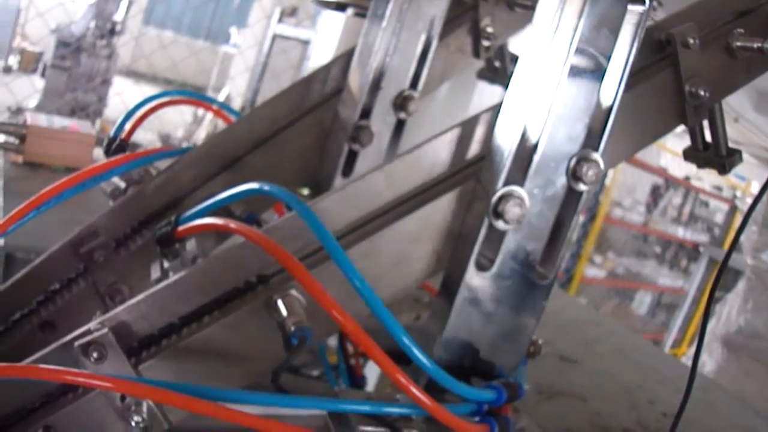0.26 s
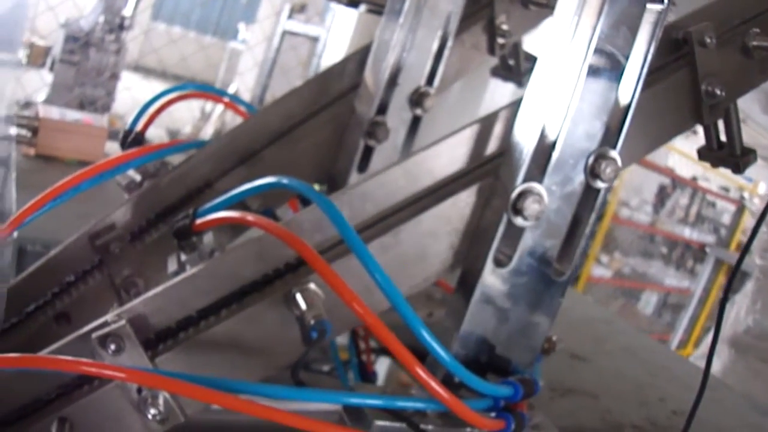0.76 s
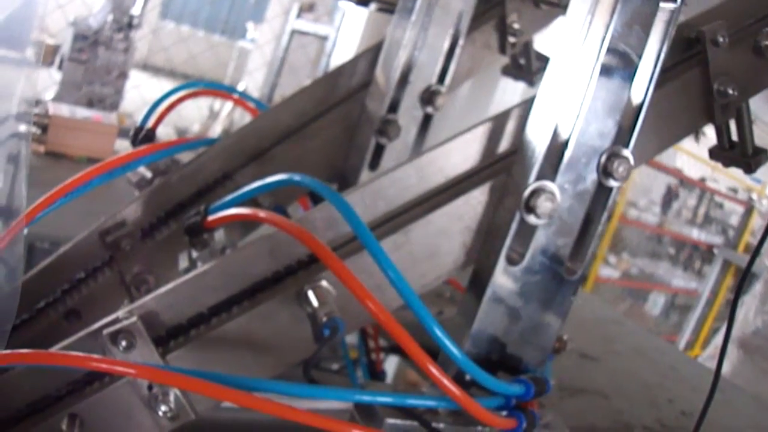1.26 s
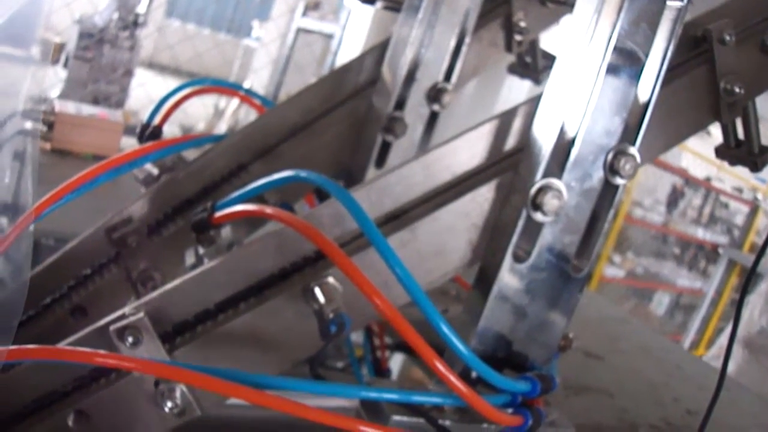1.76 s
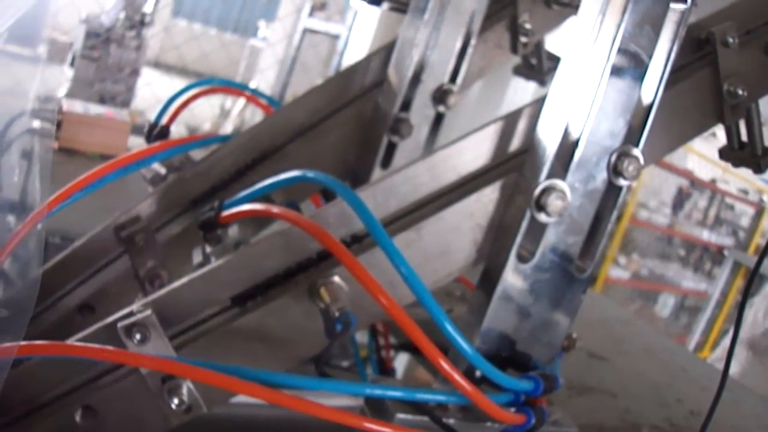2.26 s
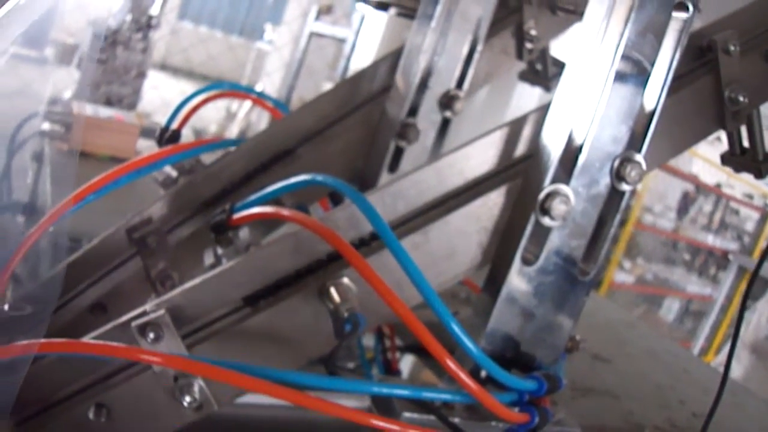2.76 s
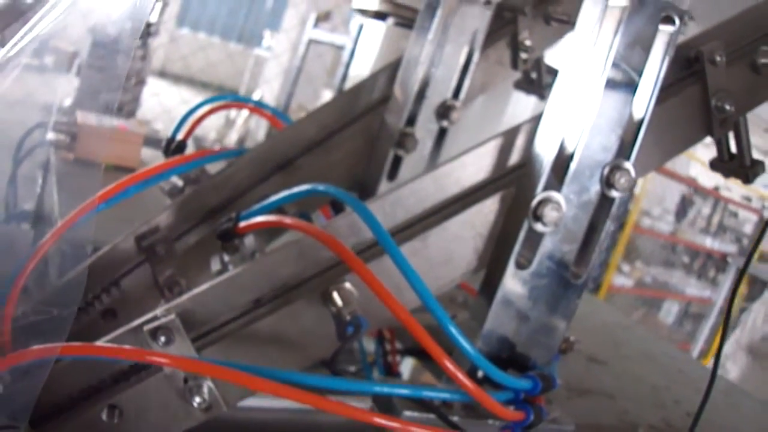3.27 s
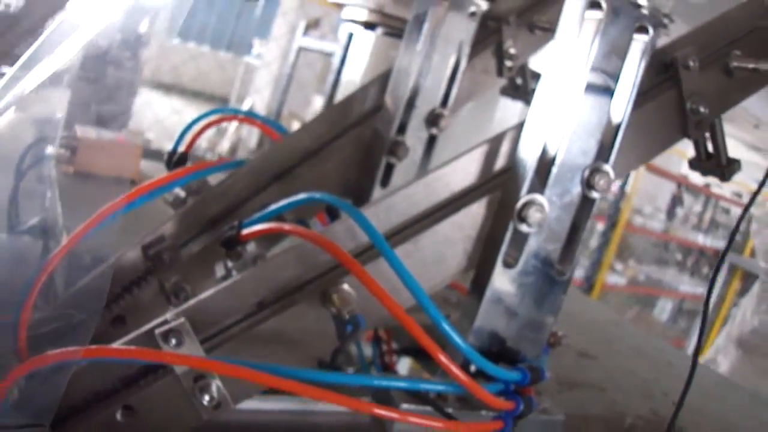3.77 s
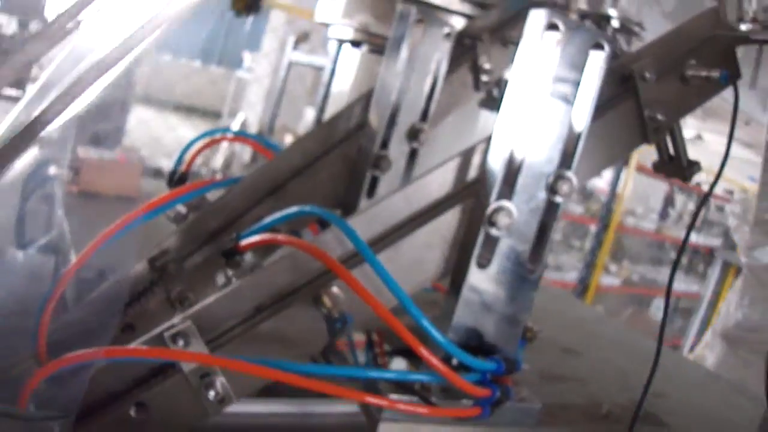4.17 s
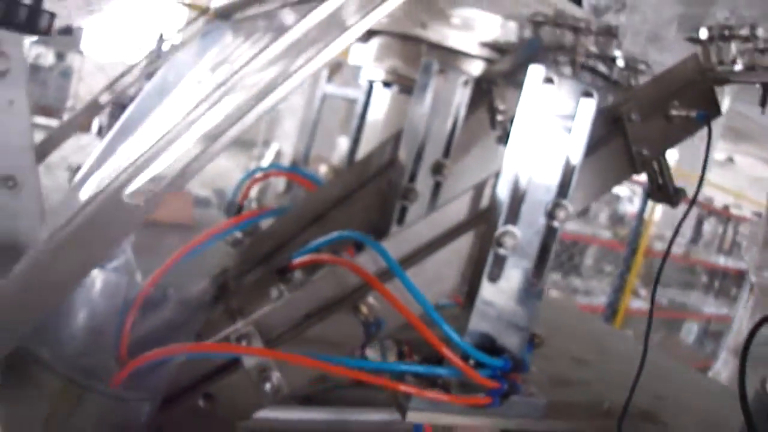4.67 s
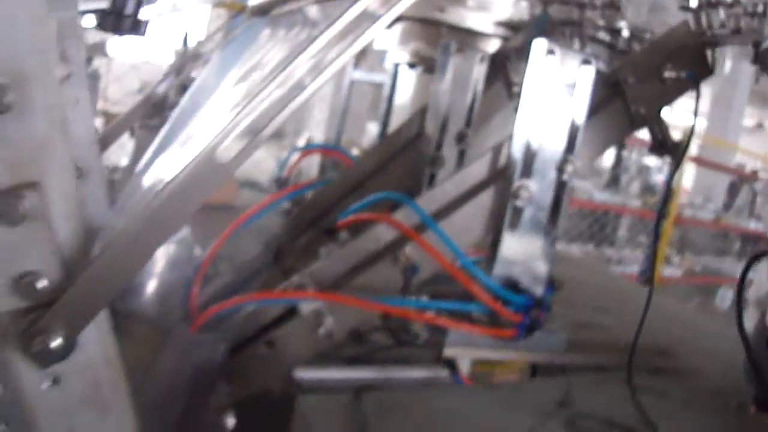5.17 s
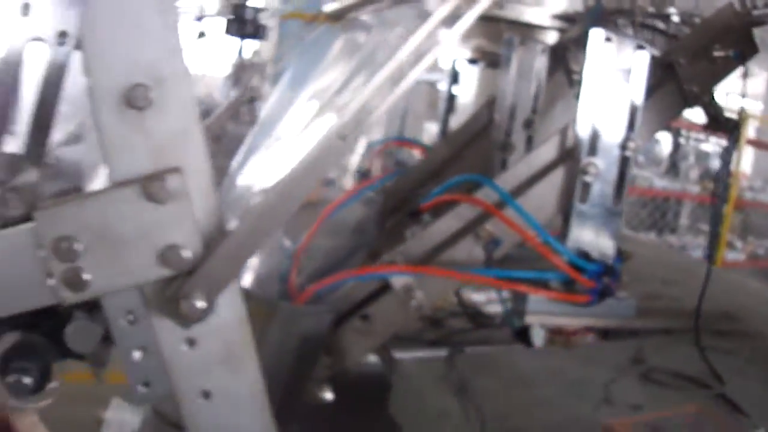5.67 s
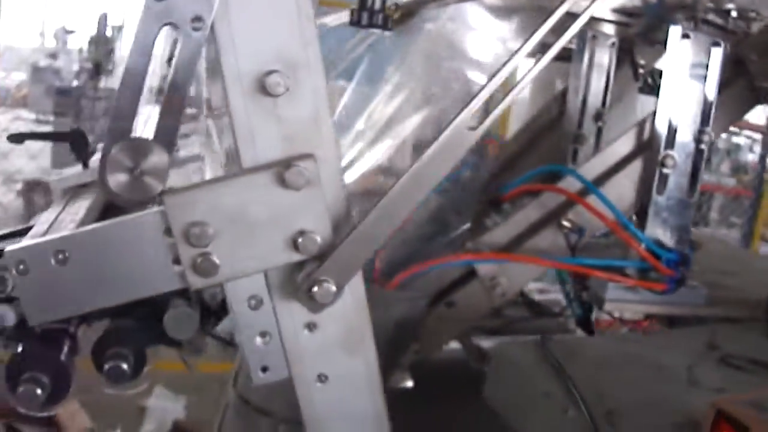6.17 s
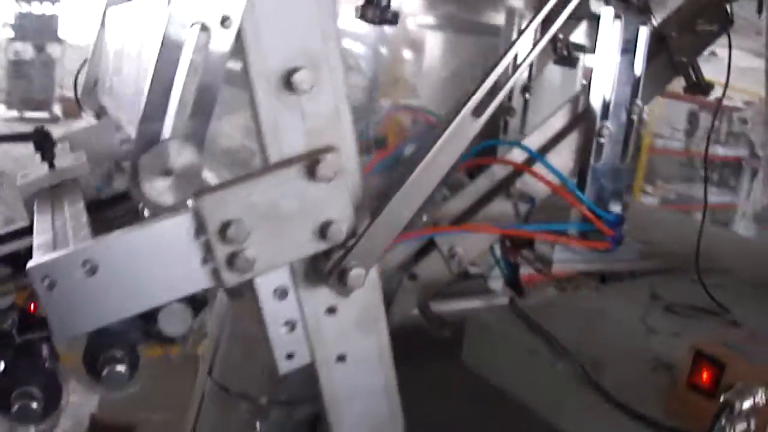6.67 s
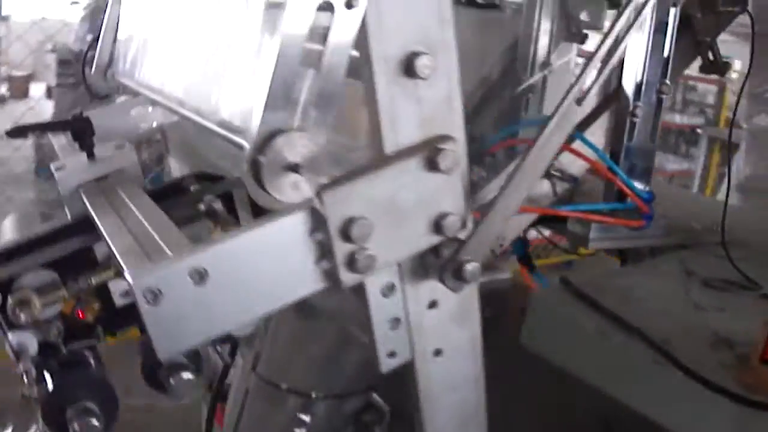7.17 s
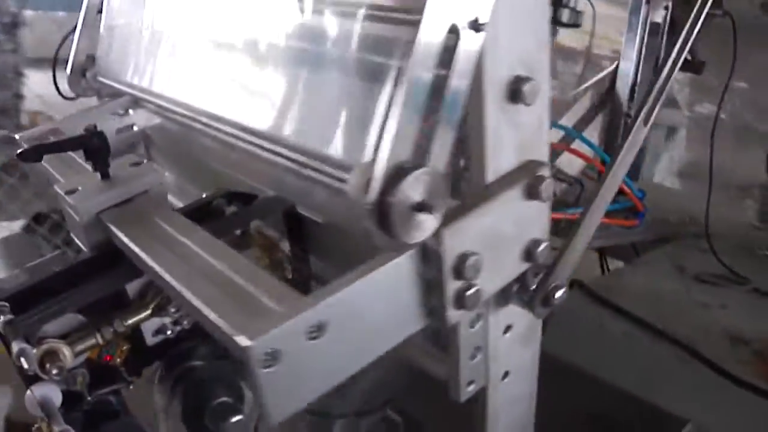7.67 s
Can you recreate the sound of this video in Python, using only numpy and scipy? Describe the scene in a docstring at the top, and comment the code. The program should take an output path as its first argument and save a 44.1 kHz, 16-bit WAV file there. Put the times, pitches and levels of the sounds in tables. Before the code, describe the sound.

Dense, bright metallic hiss and rattle from a packaging machine's feeders, scattered clacks, a crackling spill, then rising hall roar and squeaky rollers.

```python
"""Small parts on vibrating feeders

Vibrating feeders shake hard parts along steel: tiny random impacts, bunched by the mains-driven stroke, make a hiss
that swells as batches pass and rings chutes, bowl and track, coded as decaying modes; guards add a hollow ring.
Parts clack and crackle as filtered noise bursts and hits, ping as wavering modes, and a few knock dully.
A hopper wall drones, and filtered noise makes the factory roar, louder as the microphone turns to the film rollers.
Over mains hum, film starts to rasp there near the end, and rough modes squeal."""
import sys
import numpy as np
from scipy import signal
from scipy.fft import rfft, irfft, next_fast_len
from scipy.io import wavfile

SR = 44100
rng = np.random.default_rng(int(sys.argv[2]) if len(sys.argv) > 2 else 0)


def inscribe(sig):
    """Save sig as 16-bit PCM at rate SR to the path in sys.argv[1].

    A 1-D sig is mono; a 2-D sig holds one channel per row.
    Samples are clipped to [-1, 1] before scaling.
    """
    pcm = np.round(np.clip(np.atleast_2d(sig).T, -1, 1) * 32767)
    wavfile.write(sys.argv[1], SR, pcm.astype(np.int16))


N = 348831
TIME = np.arange(N) / SR
FREQ = np.fft.rfftfreq(N, 1 / SR)

# Roar of the hall. Each row: frequency in Hz, relative level in dB per Hz.
ROAR_SPECTRUM = [(25, -53), (100, -40), (200, -26), (400, -17.5), (750, -4.5), (1300, -1), (2200, -19),
                 (3600, -10.5), (6000, -4.5), (11000, -10)]
# Hum of the feeder magnets. Each row: frequency in Hz, level in dB before it opens up and wavers.
HUM_TONES = [(50, -91), (100, -90), (150, -82), (200, -73)]
# The load shifts in the hopper. Each row: start in seconds, length in seconds, extra drone in dB.
LOAD_SHIFTS = [(0.15, 0.19, 4), (0.65, 0.74, 2.5), (2.38, 0.06, 9), (3.33, 0.31, 6), (4.08, 0.15, 1),
               (5.22, 0.17, 5), (6.2, 0.43, 4)]
# Film rasping over the rollers. Each row: frequency in Hz, relative level in dB per Hz.
FILM_SPECTRUM = [(100, -40), (900, -8), (1300, 4.5), (1900, -4), (2300, -38), (2650, 2.5), (3300, 2),
                 (4600, -5), (6000, -18), (11000, -15)]
# Film rollers and their arms. Each row: frequency in Hz, width in Hz, relative level in dB.
ROLLER_MODES = [(765, 40, -7), (1330, 120, -2), (3150, 250, -1), (3520, 90, -2)]
# Roller squeals. Each row: start in seconds, length in seconds, frequency in Hz, level in dB, width in Hz.
SQUEALS = [(7.28, 0.09, 4110, -40, 90), (7.33, 0.12, 3540, -40, 70), (7.48, 0.06, 3355, -38.5, 20),
           (7.52, 0.17, 3525, -35.5, 45), (7.66, 0.19, 3635, -36.5, 60), (7.71, 0.2, 3540, -40, 50),
           (7.55, 0.08, 3200, -39, 110), (7.58, 0.37, 1765, -42.5, 30), (7.62, 0.33, 1915, -43, 70),
           (7.7, 0.25, 1861, -36.6, 11)]
# Dull knocks on the frame. Each row: start in seconds, peak in dB, 60 dB decay in seconds, lowest Hz.
KNOCKS = [(0.59, -44, 0.12, 70), (1.833, -32.5, 0.04, 70), (2.355, -27.8, 0.04, 185),
          (2.409, -33.5, 0.04, 85), (2.419, -33.5, 0.05, 80), (2.441, -38.5, 0.1, 75),
          (2.48, -43, 0.04, 130)]
# Chatter that makes one spot sing. Each row: time of the height in seconds, frequency in Hz, level in dB,
# length in seconds, width in Hz.
PINGS = [(0.053, 5690, -40, 0.16, 15), (0.09, 8014, -43, 0.16, 8), (0.14, 7068, -38, 0.14, 12),
         (0.28, 5186, -40, 0.14, 8), (0.18, 1920, -40, 0.3, 40), (0.72, 5730, -41, 0.6, 110),
         (0.77, 8014, -39.5, 0.2, 8), (0.95, 3620, -43, 0.6, 170), (1.39, 972, -44, 0.17, 12),
         (1.48, 3630, -39, 0.62, 170), (1.71, 972, -43, 0.1, 12), (1.85, 8014, -38, 0.42, 8),
         (1.9, 7068, -43.5, 0.4, 12), (1.945, 5690, -35, 0.11, 12), (1.93, 5186, -39.5, 0.2, 8),
         (2.3, 8014, -38, 0.2, 8), (2.44, 3165, -38, 0.14, 30), (2.45, 2657, -39, 0.14, 50),
         (2.49, 565, -45, 0.22, 14), (2.5, 1410, -40, 0.13, 60), (2.45, 5690, -39.5, 0.14, 20),
         (2.66, 5690, -36.5, 0.22, 12), (2.67, 5785, -38.5, 0.2, 30), (2.62, 285, -60, 0.2, 14),
         (2.8, 8014, -41, 0.2, 8), (2.82, 972, -47, 0.85, 14), (2.95, 1930, -43, 0.8, 130),
         (2.965, 8014, -36.5, 0.17, 8), (3.44, 8123, -39.5, 0.16, 12), (3.7, 8123, -43.5, 0.35, 10),
         (3.81, 5040, -41, 0.2, 20), (4.05, 7600, -42, 0.6, 50), (5.28, 1220, -40, 0.05, 50),
         (5.312, 1644, -36, 0.08, 12), (5.5, 1484, -43, 0.35, 16), (5.9, 1585, -42, 0.14, 25),
         (5.98, 1468, -43, 0.25, 20), (6.118, 5183, -34.5, 0.17, 12), (6.37, 1380, -38, 0.05, 110),
         (6.403, 5186, -36, 0.08, 8), (6.8, 2660, -41, 0.6, 150), (6.7, 1220, -40, 0.1, 35),
         (6.83, 966, -42, 0.2, 16), (6.95, 1472, -38.5, 0.11, 28), (6.98, 1370, -41, 0.12, 40),
         (7.045, 1233, -36, 0.1, 22), (7.05, 1478, -40, 0.08, 28), (7.2, 1480, -36.5, 0.11, 26),
         (7.24, 760, -39.5, 0.11, 14), (7.48, 4480, -37, 0.12, 18), (7.78, 975, -41, 0.3, 14)]
# Parts dropping on a chute. Each row: start in seconds, impact level in dB before CLACK_TRIM_DB, lowest Hz.
CLACKS = [(0.247, -26.4, 1500), (0.649, -23.3, 600), (0.834, -25, 2000), (1.237, -27, 1200),
          (1.568, -28.3, 2000), (2.398, -30, 2000), (2.416, -26, 2500), (2.431, -27, 900),
          (2.483, -24.5, 1800), (2.495, -28, 3000), (2.52, -30, 3000), (2.954, -22.8, 2600),
          (3.384, -23.5, 900), (3.535, -27.9, 1200), (3.923, -25.8, 1200), (4.181, -27.5, 2500),
          (4.192, -26.3, 600), (4.288, -25.8, 1200), (4.305, -28, 900), (5.006, -23, 600),
          (5.067, -30, 1500), (5.27, -27.5, 1200), (5.83, -28.6, 1200), (6.484, -31, 2000),
          (7.663, -30, 2500)]
# Hard part on steel. Each row: frequency in Hz, relative level in dB per Hz.
CLACK_SPECTRUM = [(100, -45), (500, -17), (1300, -2), (2300, -2), (3700, 0), (5500, -1), (8000, -6),
                  (11000, -8)]
# Pours of the nearest batch. Each row: start in seconds, length in seconds, linear gain.
SPILLS = [(2.335, 0.04, 0.45), (2.394, 0.058, 0.85), (2.477, 0.022, 0.85), (2.508, 0.026, 0.75)]
# Hollow ring of the sheet guards. Each row: frequency in Hz, relative level in dB per Hz.
GUARD_SPECTRUM = [(400, -54), (1050, -27), (1220, -0.5), (1370, 4), (1560, 1), (1920, -1), (2200, -23),
                  (4000, -32)]
# Level of that ring. Each row: time in seconds, level in dB.
GUARD_LEVEL = [(0.1, -37.5), (0.45, -40.5), (1.1, -42), (1.7, -37), (2.0, -40), (2.5, -40.5), (2.7, -43),
               (3.15, -47), (3.3, -40), (4.3, -35.5), (4.55, -40), (5.1, -41), (5.35, -41), (5.6, -44),
               (6.0, -39), (6.25, -45), (6.9, -42.5), (7.9, -50)]
# The parts' own clicks. Each row: frequency in Hz, relative level in dB per Hz.
RATTLE_SPECTRUM = [(25, -43), (70, -39), (150, -31.5), (310, -21), (430, -15), (700, -13), (1080, -9),
                   (1300, -5.5), (1900, -2.5), (2250, -5), (3000, -4), (3700, -3), (4400, -4), (5600, -3),
                   (7300, -6), (9300, -3.5), (11000, -5.5)]
# Batches that crowd the chutes. Each row: start in seconds, length in seconds, extra flow in dB.
BATCHES = [(0.58, 0.12, 0.6), (1.14, 1.29, 1.5), (2.33, 0.18, 1.8), (3.33, 1, 1.1), (4.14, 0.11, 0),
           (6.48, 0.3, 0.9)]
# Modes of the chutes and guards. Each row: frequency in Hz, width in Hz, level in dB before the shaking gain.
CHUTE_MODES = [(561, 6, -56), (769, 56, -51.5), (900, 12, -53), (972, 14, -52), (1219, 71, -47),
               (1369, 9, -49), (1475, 5, -52), (1650, 9, -51), (1769, 5, -54.7), (1915, 26, -49),
               (2360, 16, -51), (2425, 5, -54), (2571, 74, -45.5), (2843, 51, -47), (2964, 19, -49.8),
               (3165, 70, -51), (3358, 24, -53.5), (3551, 90, -44), (3694, 50, -44.7), (4112, 80, -45)]
# Modes of the bowl. Each row: frequency in Hz, width in Hz, level in dB before the shaking gain.
BOWL_MODES = [(4481, 14, -47.2), (4674, 6, -52.1), (5048, 27, -45.7), (5186, 8, -47.5), (5690, 11, -44.2),
              (5787, 28, -44.5), (6333, 5, -51.0), (6394, 12, -51.1), (6615, 9, -50.1), (6732, 5, -51.6),
              (6860, 12, -47.2), (7068, 13, -45.8), (7125, 15, -49.4), (7427, 5, -51.5), (8822, 25, -49.9),
              (10222, 59, -46.6), (10314, 7, -49.6)]
# High modes of the narrow feed track. Each row: frequency in Hz, width in Hz, level in dB before the shaking gain.
TRACK_MODES = [(7600, 71, -49), (7942, 33, -51), (8014, 5, -52), (8123, 12, -50.5)]

STROKE_HZ = 50
EDGE_HZ = 11020  # top of the recorder's band
# the microphone turns to the film rollers and the open hall
TURN_START_S, TURN_S = 6.14, 0.62
HALL_DB, HALL_OPEN_DB, HUM_OPEN_DB = -39, 8.5, 6
DRONE_DB, SHIFT_RISE_S, SHIFT_FALL_S = -48, 0.036, 0.094
PULL_START_S, PULL_RISE_S, FILM_PULL_DB = 7, 0.4, -32
GRABS_PER_S, GRAB_JITTER, GRAB_DEPTH, SQUEAL_RISE_S = 30, 0.3, 0.4, 0.045
# singing modes: flutter of the strength (0-1), gain of the rasp and its extra width
FLUTTER, RASP, RASP_HZ = 0.35, 0.4, 70
CLACK_T60_S, LANDING_S, CLACK_TRIM_DB = 0.083, 0.0008, 1.0
# lighter parts drop at random; their levels also take CLACK_TRIM_DB
LIGHT_COUNT, LIGHT_DB, LIGHT_SPREAD_DB, LIGHT_LOW_HZ = 8, -32.5, 1.5, 1500
SPILL_DB, SPILL_RISE_S, SPILL_FALL_S = -30.5, 0.006, 0.028
# the steady trickle of parts, and how fast the flow builds and drains
FEED_DB, FLOW_RISE_S, FLOW_FALL_S = -26, 0.015, 0.053
# ringing steel: gain at the steady trickle in dB, and dB gained per dB of extra flow
CHUTE_DB, CHUTE_FOLLOW = 0.15, 0.36
BOWL_DB, BOWL_FOLLOW = 0.5, 0.97
TRACK_DB, TRACK_FOLLOW = 4, 1.2
# the microphone backs away from the bowl and the track
RETREAT_START_S, RETREAT_S, RETREAT_DB = 2.5, 0.9, -2.5


def amp(db):
    """Decibels to gain."""
    return 10 ** (np.asarray(db) / 20)


def unit(x):
    """Scales to rms 1."""
    return x / np.sqrt(np.mean(x ** 2) + 1e-20)


def colour(x, spectrum):
    """Filters by a spectrum drawn on a log-frequency axis; rms 1."""
    hz, db = np.transpose(spectrum)
    f = np.fft.rfftfreq(len(x), 1 / SR)
    gain = amp(np.interp(np.log(f + 1), np.log(hz), db))
    return unit(irfft(rfft(x) * gain, len(x)))


def drift(rate_hz):
    """Slow random wavering, rms 1."""
    slow = np.exp(-(FREQ / rate_hz) ** 2)
    return unit(irfft(rfft(rng.standard_normal(N)) * slow, N))


def ramp(start_s, length_s):
    """Rises evenly from 0 to 1, then stays."""
    return np.clip((TIME - start_s) / max(length_s, 1 / SR), 0, 1)


def swells(rows, rise_s, fall_s):
    """Sums events that each rise to their height and later fall back."""
    return sum(height * (ramp(s, rise_s) - ramp(s + length, fall_s)) for s, length, height in rows)


def add(mix, s, sound):
    """Mixes a sound in at a time."""
    part = mix[max(round(s * SR), 0):][:len(sound)]
    part += sound[:len(part)]


def thin_steel(x):
    """Thin sheets radiate hardly any bass."""
    return signal.sosfilt(signal.butter(4, 480, "high", fs=SR, output="sos"), x)


def ring(drive, modes, wander_db):
    """A drive excites decaying modes; each swells and fades at random, as when parts cross its nodes."""
    out = np.zeros(N)
    for hz, width, db in modes:
        r = np.exp(-np.pi * max(width, 1) / SR)  # a wider mode decays faster
        resonance = [1, -2 * r * np.cos(2 * np.pi * hz / SR), r * r]
        mode = signal.lfilter([1, 0, -1], resonance, drive)
        knots = np.linspace(0, TIME[-1], 48)
        wander = np.interp(TIME, knots, amp(wander_db * rng.uniform(-1.65, 1, len(knots))))
        out += amp(db) * unit(mode * wander)
    return out


def noise_band(f, hz, width_hz, size):
    """Narrow complex noise around one frequency."""
    phase = 2j * np.pi * rng.random(len(f))
    return np.fft.ifft(np.exp(-((f - hz) / width_hz) ** 2 + phase))[:size]


def sing(hz, width_hz, flutter, size):
    """One mode kept going: its phase wanders, flutter moves its strength, and a wider noise band adds a rasp."""
    f = np.fft.fftfreq(next_fast_len(size + SR), 1 / SR)
    z = noise_band(f, hz, width_hz, size)
    touches = noise_band(f, hz, width_hz + RASP_HZ, size)
    tone = z.real / (abs(z) + 1e-20) ** (1 - flutter)
    return unit(unit(tone) + RASP * unit(touches.real))


def impacts(per_s, spread_db, stroke, second_stroke, clump_db):
    """Random tiny hits; parts land in step with the stroke and jostle in clumps."""
    hits = (rng.random(N) < per_s / SR) * rng.choice([-1., 1.], N)
    size = amp(spread_db * np.minimum(rng.exponential(1, N), 5))
    turn = 2 * np.pi * STROKE_HZ * TIME
    beat = 1 + stroke * np.cos(turn) + second_stroke * np.cos(2 * turn)
    return unit(hits * size * beat * amp(clump_db * drift(rate_hz=12.0)))


def scatter(x, t60, wet):
    """Countless weak modes of the surrounding steel; their pattern shifts as the microphone moves."""
    t, out = TIME[:SR // 3], x.copy()
    places = np.linspace(0, TIME[-1], 9)
    for s in places:
        tail = rng.standard_normal(len(t)) * amp(-60 * t / t60)
        nearness = np.sqrt(np.maximum(1 - abs(TIME - s) / places[1], 0))
        out += wet * nearness * signal.oaconvolve(x, tail / np.linalg.norm(tail))[:N]
    return unit(out)


def hall():
    """Distant machinery blurred into a roar, over the mains hum; both open up as the microphone turns."""
    facing = ramp(TURN_START_S, TURN_S)
    roar = amp(HALL_DB + HALL_OPEN_DB * facing) * colour(rng.standard_normal(N), ROAR_SPECTRUM)
    hum = np.zeros(N)
    for hz, db in HUM_TONES:
        hum += amp(db) * np.sqrt(2) * np.sin(2 * np.pi * (hz * TIME + rng.random()))
    opening = unit(amp(HUM_OPEN_DB * facing))  # keeps the average level
    return roar + hum * opening * amp(2 * drift(rate_hz=1.2))


def hopper():
    """The shifting load drums on two close modes of a wide wall, driven by noise."""
    wall = ring(rng.standard_normal(N), [(626.6, 13.3, 13.0), (652, 3.7, 5.5)], wander_db=1.5)
    drone_db = DRONE_DB + swells(LOAD_SHIFTS, SHIFT_RISE_S, SHIFT_FALL_S)
    return amp(drone_db) * unit(thin_steel(wall))


def film():
    """Plastic film rasps over the rollers in fine stick and slip and makes them sing; speed sets loudness."""
    speed = ramp(PULL_START_S, PULL_RISE_S)
    slips = amp(0.66 * drift(rate_hz=49)) * rng.standard_normal(N)
    singing = unit(ring(slips, ROLLER_MODES, wander_db=8))
    rasp = colour(rng.standard_normal(N), FILM_SPECTRUM) * amp(drift(rate_hz=44))
    return amp(FILM_PULL_DB) * speed * (rasp + amp(-11.0) * thin_steel(singing))


def squeals():
    """The film grabs and lets go of the rollers; the rough squeal hops between modes."""
    out = np.zeros(N)
    for s, length, hz, db, width in SQUEALS:
        swell = swells([(s, length, 1)], SQUEAL_RISE_S, SQUEAL_RISE_S)
        on = swell > 0
        out[on] += amp(db) * swell[on] * sing(hz, width, FLUTTER, size=on.sum())
    grabs = np.cumsum(GRABS_PER_S * (1 + GRAB_JITTER * drift(rate_hz=12))) / SR
    return out * unit(1 + GRAB_DEPTH * np.cos(2 * np.pi * grabs))


def knocks():
    """Heavily damped thuds of the frame: a firm push and a brief shudder through a low band."""
    out, t = np.zeros(N), TIME[:SR // 4]
    for s, db, t60, low_hz in KNOCKS:
        band = signal.butter(3, [low_hz, 650], "band", fs=SR, output="sos")
        # a small panel radiates its lowest notes weakly
        panel = signal.butter(1, 250, "high", fs=SR, output="sos")
        shudder = 0.03 * rng.standard_normal(len(t)) * amp(-60 * t / t60)
        blow = (t == 0) + shudder
        thud = signal.sosfilt(np.vstack([band, panel]), blow)
        add(out, s, amp(db) * thud / abs(thud).max())
    return out


def pings():
    """A mode swells and fades while parts chatter on its spot."""
    out = np.zeros(N)
    for s, hz, db, length, width in PINGS:
        near = abs(TIME - s) < length / 2
        swell = np.sqrt(abs(np.cos(np.pi * (TIME[near] - s) / length)))
        out[near] += amp(db) * swell * sing(hz, width, FLUTTER, size=len(swell))
    return out


def clacks():
    """Each dropped part is a short noise burst, dense as steel resonances, with a softened onset."""
    out, t = np.zeros(N), TIME[:SR // 4]
    landing = 1 - np.exp(-t / LANDING_S)
    light = []
    for when, force in rng.random((LIGHT_COUNT, 2)):
        light.append((TIME[-1] * when, LIGHT_DB + LIGHT_SPREAD_DB * (2 * force - 1), LIGHT_LOW_HZ))
    for s, db, low_hz in CLACKS + light:
        thin = signal.butter(2, low_hz, "high", fs=SR, output="sos")  # small parts sound thinner
        noise = colour(rng.standard_normal(len(t)), CLACK_SPECTRUM)
        burst = signal.sosfilt(thin, noise) * landing * amp(-60 * t / CLACK_T60_S)
        # the level is that of the first 11 ms
        add(out, s, amp(CLACK_TRIM_DB + db) * burst / np.std(burst[t < 0.011]))
    return out


def spill():
    """The biggest batch tumbles out close by in quick pours of sparser hits, so that it crackles."""
    hits = impacts(per_s=1400, spread_db=1.5, stroke=0.18, second_stroke=0.11, clump_db=1.2)
    pours = swells(SPILLS, SPILL_RISE_S, SPILL_FALL_S)
    return amp(SPILL_DB) * pours * colour(hits, CLACK_SPECTRUM)


def guards():
    """The sheet guards give the rattle a hollow middle that comes and goes."""
    hits = impacts(per_s=5000, spread_db=2.0, stroke=0.018, second_stroke=0.13, clump_db=2.0)
    level_db = np.interp(TIME, *np.transpose(GUARD_LEVEL))
    return amp(level_db) * colour(hits, GUARD_SPECTRUM)


def feeder():
    """The parts' own clicks, and the chutes, bowl and track they set ringing; all follow the flow."""
    flow_db = swells(BATCHES, FLOW_RISE_S, FLOW_FALL_S)
    away_db = RETREAT_DB * ramp(RETREAT_START_S, RETREAT_S)
    near = impacts(per_s=12000, spread_db=2.5, stroke=0.18, second_stroke=0.11, clump_db=1.2)
    # countless farther hits merge into an even wash
    wash = scatter(near + rng.standard_normal(N), t60=0.11, wet=0.71)
    rattle = amp(FEED_DB + flow_db) * colour(wash, RATTLE_SPECTRUM)
    steel = np.zeros(N)
    for modes, shaking_db in [(CHUTE_MODES, CHUTE_DB + CHUTE_FOLLOW * flow_db),
                              (BOWL_MODES, BOWL_DB + BOWL_FOLLOW * flow_db + away_db),
                              (TRACK_MODES, TRACK_DB + TRACK_FOLLOW * flow_db + away_db)]:
        hits = impacts(per_s=5000, spread_db=3, stroke=0.018, second_stroke=0.097, clump_db=1.1)
        steel += amp(shaking_db) * ring(hits, modes, wander_db=2.8)
    return rattle + thin_steel(steel)


def scene():
    """Everything at one microphone."""
    background = hall() + hopper() + film() + squeals()
    single_parts = knocks() + pings() + clacks()
    flow = spill() + guards() + feeder()
    return (background + single_parts + flow)[None]


def record(dry):
    """The recorder's steep band limit."""
    lowpass = signal.firwin(2047, EDGE_HZ, window=("kaiser", 9), fs=SR)
    return signal.oaconvolve(dry, lowpass[None], "same")


dry = scene()
out = record(dry)
inscribe(out)
```